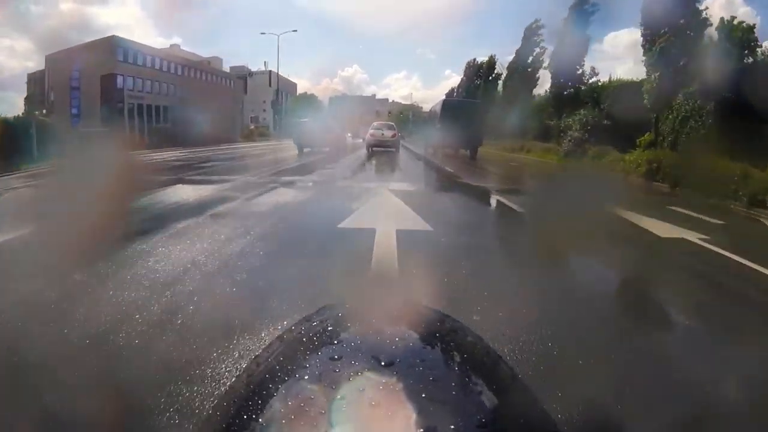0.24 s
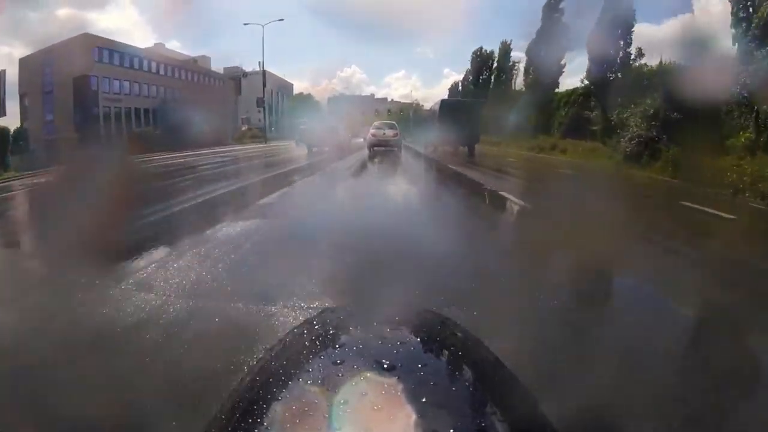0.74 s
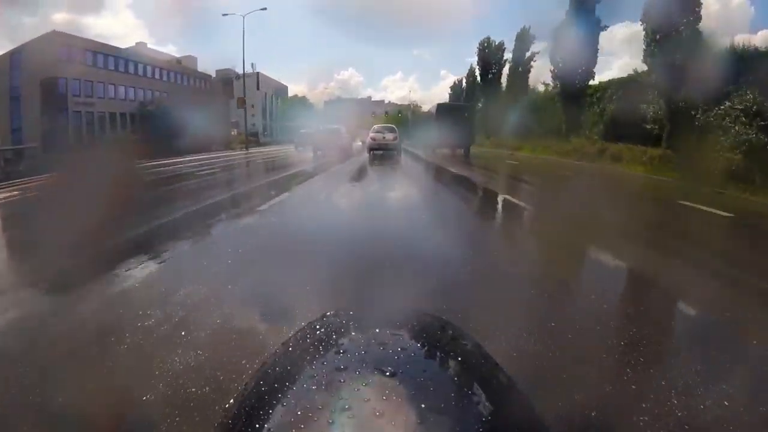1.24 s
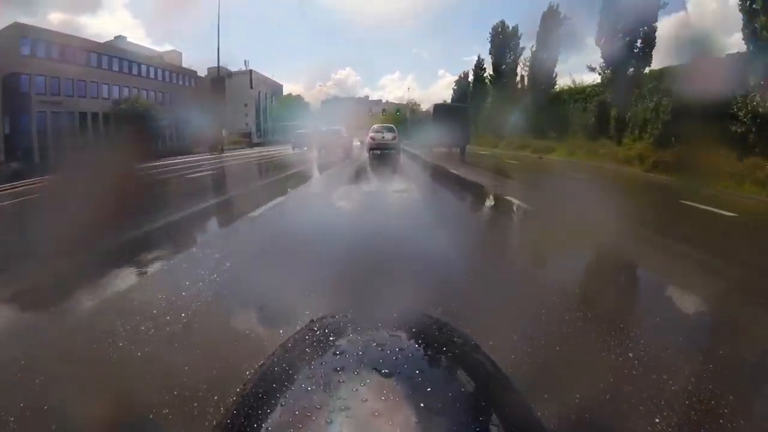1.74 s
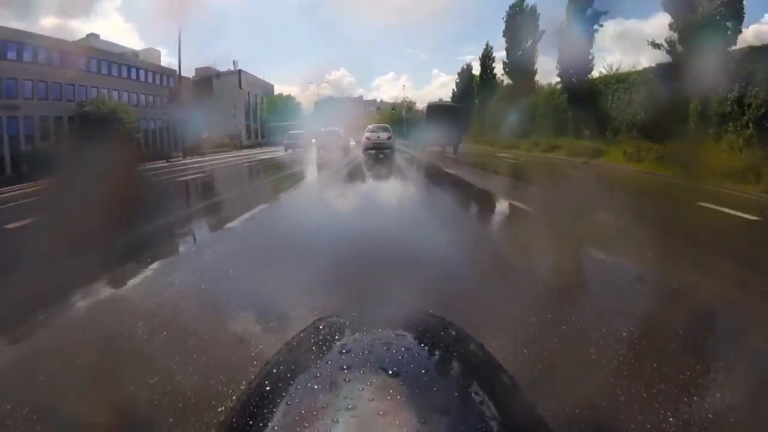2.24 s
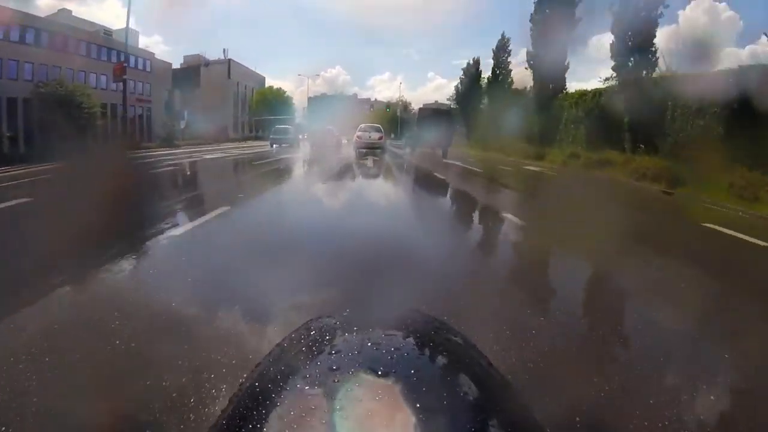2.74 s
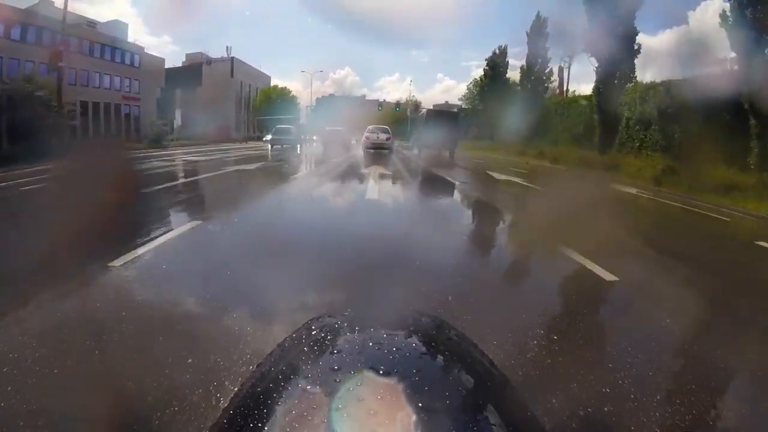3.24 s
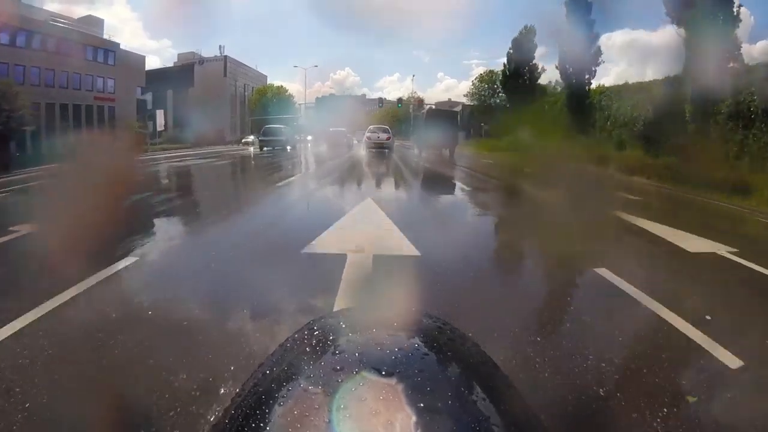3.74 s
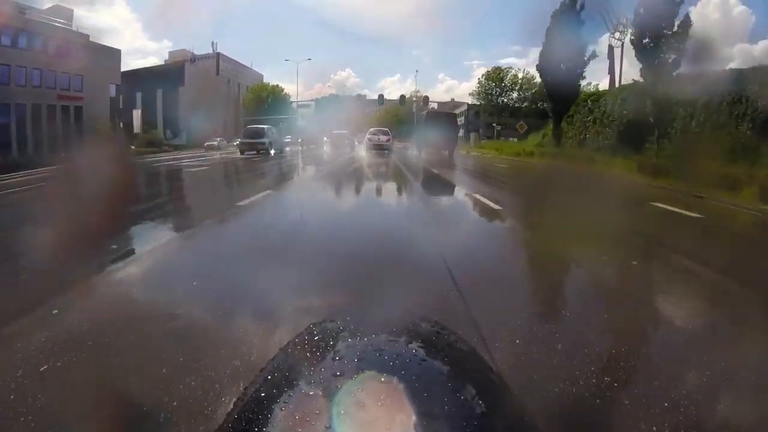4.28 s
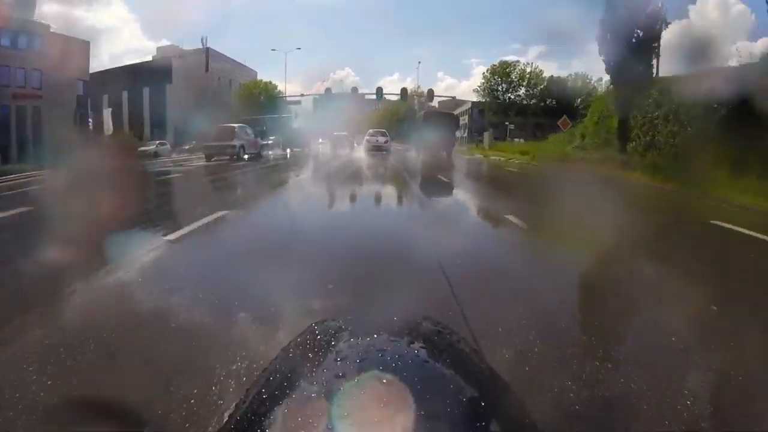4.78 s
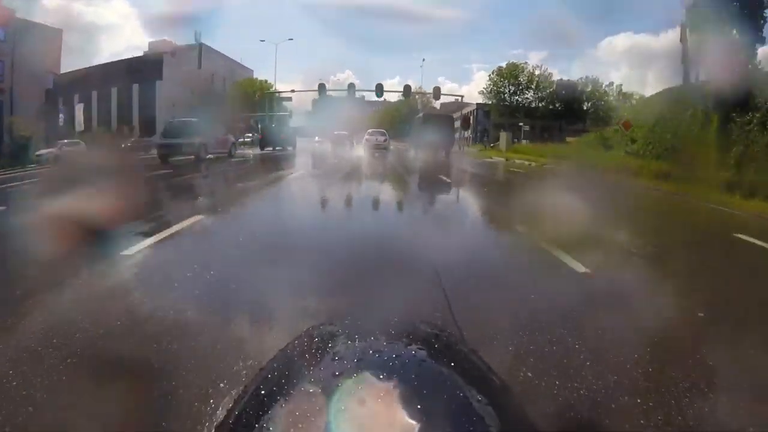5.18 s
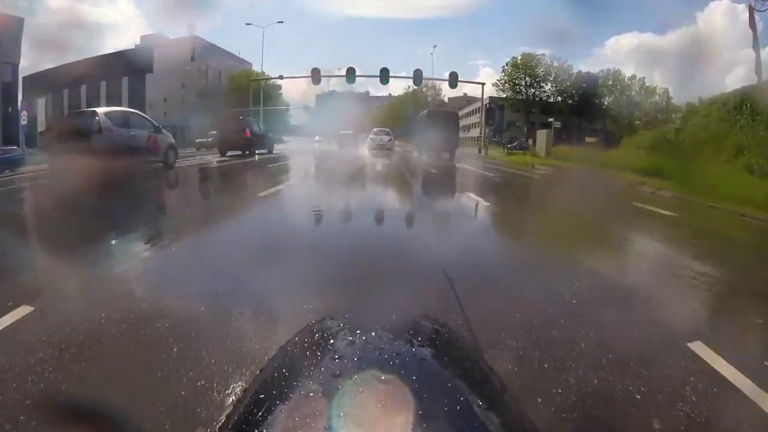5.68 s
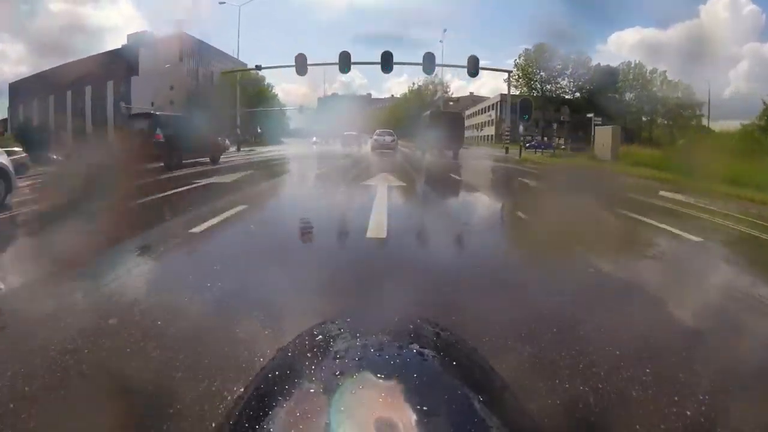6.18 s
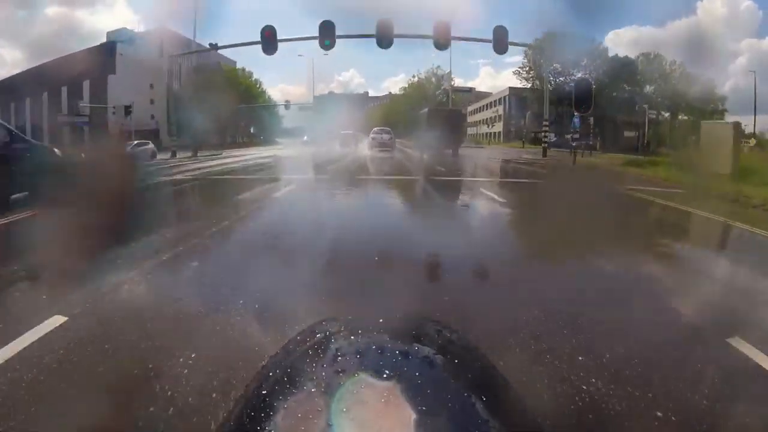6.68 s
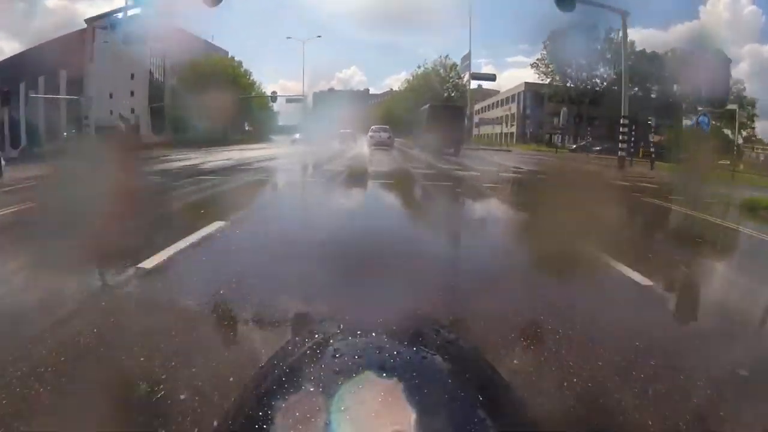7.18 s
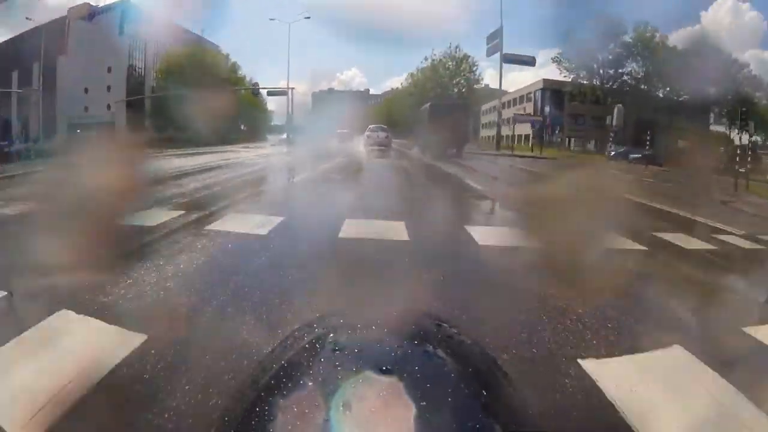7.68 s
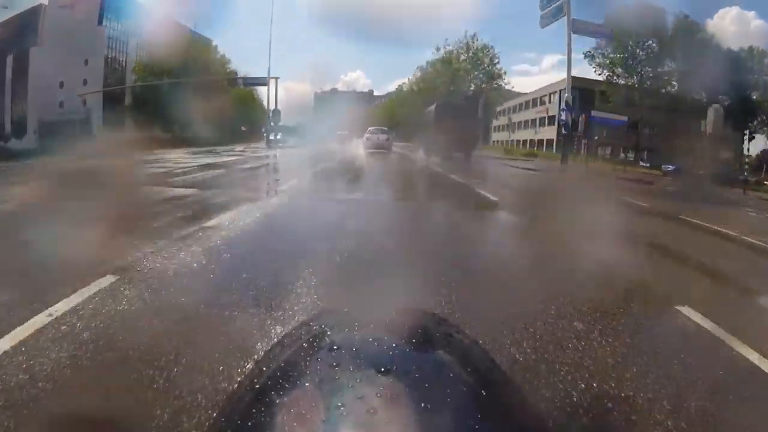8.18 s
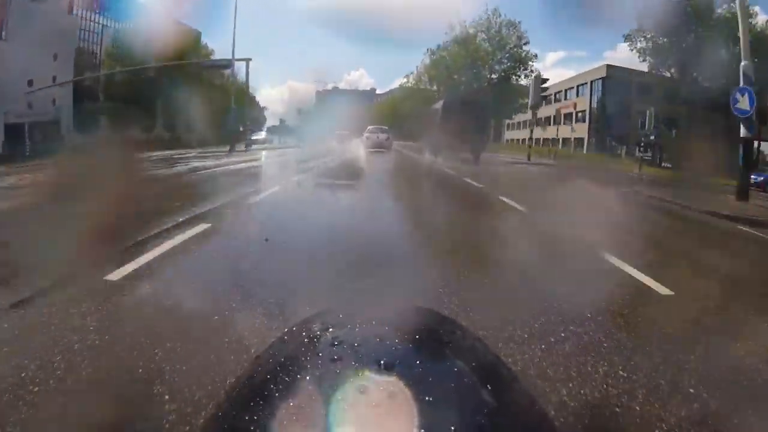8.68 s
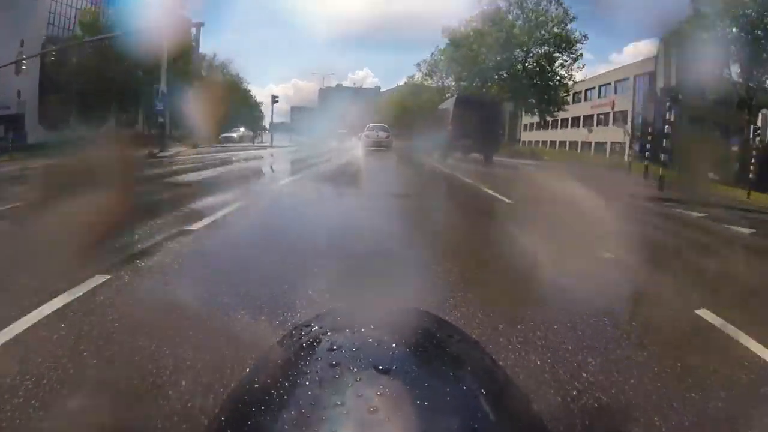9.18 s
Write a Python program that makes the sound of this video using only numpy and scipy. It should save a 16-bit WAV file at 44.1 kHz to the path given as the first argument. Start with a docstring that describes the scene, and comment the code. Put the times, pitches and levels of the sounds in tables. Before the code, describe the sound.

Heavy wind buffets a microphone behind the screen of a motorcycle on a wet city road for about nine seconds. A deep rumble runs under uneven gusts, and short, sharp slaps of air hit the microphone irregularly, hardest around 0.6 to 1.5 seconds and near 7.8. Beneath the wind, a low exhaust drone and faint gear whine rise smoothly in pitch, levelling off at about 8.5 seconds. The drone is faint at first, swells at around 4.7 seconds, stays strong until nearly 7, fades by 8.5 and comes back at the end. The tyres make a soft hiss of spray throughout, fullest from 3 to 4.4 seconds, then dropping suddenly before partly returning. Brief, light splashes come at about 0.5, 1.6 and 6 seconds. The wind turns brighter and more tearing around 1.5 seconds and again from 7 to 8.5.

```python
"""A rain-soaked city road, heard from behind the screen of a motorcycle gathering speed.
Wind buffets the microphone in gusts, and single eddies slap its port. The tyres tear off a hiss
of spray and splash through standing water. Underneath, the exhaust drones and the gears whine,
all rising with the engine. The housing round the microphone colours the treble."""
import sys
import numpy as np
from scipy import signal
from scipy.fft import rfft, irfft, next_fast_len
from scipy.io import wavfile
from scipy.ndimage import uniform_filter1d

SR = 44100
rng = np.random.default_rng(int(sys.argv[2]) if len(sys.argv) > 2 else 0)


def wrap_up_sound(samples):
    """Save the sound to the file named by the first command line argument, as 16-bit audio."""
    columns = np.atleast_2d(samples).T
    # keep every value between -1 and 1, then stretch to whole-number steps
    tamed = np.clip(columns, -1, 1)
    steps = np.round(tamed * 32767).astype(np.int16)
    wavfile.write(sys.argv[1], SR, steps)


N = 415422

# Engine speed. Each row: time in seconds, firing rate in Hz.
FIRING_HZ = [(0, 59.5), (1.3, 63), (2, 65.4), (2.5, 68), (3.1, 71), (3.7, 73.7), (4.2, 76.8), (4.7, 81.2),
             (5.5, 87.4), (6, 91.2), (6.7, 96.5), (7.3, 99.8), (8.3, 103.4), (8.8, 103.9), (9.42, 104)]
# Exhaust drone at the firing rate. Each row: time in seconds, level in dB.
DRONE_DB = [(0, -42.5), (1.8, -39), (2.4, -32), (4.35, -33.5), (4.75, -22.5), (5.1, -19), (5.7, -20.5),
            (6.1, -22), (6.7, -23.5), (8.5, -38.5), (9.42, -25.5)]
# Exhaust overtones and gear tones, each swelling through a resonance.
# Each row: multiple of the firing rate, resonance in Hz, width in Hz, level at resonance in dB.
WHINES = [(2, 150, 14, -37), (2, 186, 56, -40), (3, 200, 40, -37.5), (3, 295, 50, -38), (5, 518, 7, -39),
          (6.12, 476, 46, -38.5), (6.12, 585, 70, -44), (6.55, 474, 30, -41.5), (12, 890, 36, -43),
          (12.23, 905, 72, -38.5), (12.23, 840, 40, -50), (12.23, 1220, 60, -45), (14.75, 1090, 160, -48.5),
          (11.55, 1045, 110, -47), (18.05, 1300, 130, -53), (24, 2100, 260, -57.5),
          (47.7, 4720, 220, -53.5), (48, 4980, 60, -59.5)]
# Steady flow round the screen. Each row: time in seconds, buffeting in dB, rumble in dB.
AIRFLOW_DB = [(0, -29.5, -22.5), (.8, -31.5, -27), (1.5, -28.5, -26.5), (2, -32, -31), (3, -30, -24),
              (4.3, -26.5, -24), (4.65, -34.5, -28), (5.4, -31, -36), (5.7, -31.5, -26), (6.4, -28, -28),
              (7.1, -23.5, -25.5), (7.999, -28.5, -26.5), (8.25, -29, -31), (8.7, -28.5, -27),
              (9.42, -28, -21.5)]
# Gusts over the screen. Each row: start in seconds, length in seconds, buffeting in dB, tilt in dB.
GUSTS = [(0.113, 0.031, -21.5, -6), (0.217, .07, -25.5, 0.5), (0.345, .07, -25, -13),
         (0.629, .09, -22, -1.5), (0.734, .15, -24, 3.5), (0.976, .19, -28, 3), (1.236, .2, -27, 10),
         (1.471, 0.15, -30.5, 17.5), (1.656, 0.082, -28.5, 22), (1.926, 0.043, -27.5, -4.5),
         (2.21, 0.023, -26, -10), (2.34, .14, -25, 0.5), (2.528, .15, -25, -1.5), (3.389, 0.33, -28, -12.5),
         (4.06, .11, -24, -4.5), (4.178, .1, -23, -0.5), (4.278, 0.099, -20.5, 3), (4.837, .035, -31, 9.5),
         (4.942, 0.098, -30, 1.5), (5.566, 0.14, -24, 0.5), (5.698, 0.074, -23.5, -0.5),
         (5.811, .26, -26, 2), (6.473, 0.041, -22, 1), (6.626, 0.023, -22.5, -1), (6.898, 0.09, -22.5, 7.5),
         (7.057, .07, -24, 3), (7.175, 0.2, -35, 7), (7.611, 0.503, -29, 11), (7.788, .23, -24.5, 1.5),
         (8.138, 0.46, -37, 15), (8.812, 0.067, -20, -4.5), (9.064, 0.069, -23, -10.5),
         (9.214, 0.25, -22.5, -6.5)]
# Buffeting spectrum. Each row: frequency in Hz, density in dB.
WIND_SPECTRUM_DB = [(60, -28.5), (85, 10), (120, 8.5), (200, 6.5), (300, 2), (500, -3), (700, -6),
                    (1000, -10), (1300, -13.5), (2000, -20), (3000, -27.5), (4100, -33), (5500, -46.5),
                    (9500, -52)]
# Spectrum of the wind's slow pressure swell. Each row: frequency in Hz, density in dB.
RUMBLE_SPECTRUM_DB = [(10, -21), (20, -8), (32, -1), (52, -2), (75, 1.5), (105, -19.5), (160, -19)]
# Tyre hiss, louder over standing water. Each row: time in seconds, level in dB.
SPRAY_DB = [(0, -48.5), (.82, -50.5), (.92, -53.5), (1.3, -51.5), (1.85, -53), (2.75, -47.5), (3.1, -45.5),
            (3.95, -42.5), (4.44, -45.5), (4.48, -56.5), (5, -52.5), (6, -50.5), (6.6, -50.5),
            (7.27, -48.5), (7.45, -52), (8.25, -57), (8.95, -51), (9.42, -54.5)]
# Spray spectrum. Each row: frequency in Hz, density in dB.
SPRAY_SPECTRUM_DB = [(300, -4.5), (500, 6.5), (720, -5.5), (1050, 4.5), (1700, -4.5), (2400, 0),
                     (3200, -2.5), (4500, -3), (5400, -4), (6500, -6), (9500, -11), (11000, -44)]
# Water film on the housing. Each row: time in seconds, gain in dB of the spray above about 6 kHz.
FILM_DB = [(0, 1), (6, 0), (7.2, -2), (7.7, -2.5), (8.7, -9), (9.42, -5.5)]
# Eddies bursting on the port. Each row: time in seconds, front in dB, front width in ms, rasp in dB.
SLAPS = [(0.1342, -8.5, .5, -33), (0.629, -6, 1, -41), (0.6442, -7, 0.38, -41), (0.652, -4.5, .38, -36.5),
         (0.8393, -7.5, 0.77, -27.5), (.914, -3.5, 0.48, -31), (1.051, -18, .6, -41),
         (1.3288, -10.5, 0.44, -31), (1.4359, -10.5, 0.26, -20.5), (1.503, -3.5, 0.28, -23),
         (2.065, -11, 0.35, -26.5), (2.8031, -8, .4, -35), (3.327, -14.5, .52, -33),
         (4.0435, -11, 0.62, -39), (4.461, -9, .5, -36.5), (4.5162, -10.5, 0.91, -36),
         (4.9544, -20.5, .26, -36.5), (5.592, -14.5, 0.28, -27.5), (5.74, -10, 0.2, -32),
         (5.9734, -15.5, 0.34, -21), (6.2144, -18, 0.28, -22.5), (6.3124, -12, .65, -25),
         (6.925, -12.5, 0.19, -25), (7.423, -9.5, .48, -27.5), (7.7599, -5, 0.8, -23.5),
         (7.8754, -10.5, 0.79, -30), (8.074, -13.5, 0.17, -22), (8.5923, -10, 0.64, -29),
         (9.0662, -10, 0.38, -25.5), (9.1715, -13, 0.28, -31), (9.316, -13, 0.41, -43)]
# Spectrum of the rasp round a slap. Each row: frequency in Hz, density in dB.
RASP_SPECTRUM_DB = [(200, -16), (500, 1.5), (1000, -4.5), (2000, -19.5), (3200, -23), (6000, -33.5)]
# Splashes. Each row: centre in seconds, half length in seconds, level in dB.
SPLASHES = [(0.518, 0.098, -43.5), (1.556, 0.0034, -37), (1.725, 0.024, -44.5), (5.986, 0.036, -45)]
# Splash spectrum. Each row: frequency in Hz, density in dB.
SPLASH_SPECTRUM_DB = [(1500, -5.5), (3800, -9), (5400, -6.5), (6600, -12.5), (9000, -15)]
# Treble peaks and notches of the housing. Each row: frequency in Hz, gain in dB.
HOUSING_DB = [(1, 0), (3200, 0), (4100, -3), (4800, 3), (5600, 4), (5850, -2), (6030, -8), (6270, -3.5),
              (6420, 5), (6900, 1.5), (7600, -3), (8500, -3), (9150, 0), (9550, -3), (11000, -20)]

TIME_S = np.arange(N) / SR


def from_db(db):
    """Decibels to gain."""
    return 10 ** (np.asarray(db) / 20)


def unit_rms(x):
    """Scale to rms 1."""
    return x / np.sqrt(np.mean(x ** 2) + 1e-20)


def curve(rows):
    """Rows of time and value, interpolated at every sample."""
    return np.interp(TIME_S, *np.transpose(rows))


def gain_at(spectrum_db, hz):
    """Gain of a spectrum table at hz; -90 dB beyond its ends."""
    knots_hz, db = np.transpose(spectrum_db)
    return from_db(np.interp(np.log(hz + 1e-3), np.log(knots_hz), db, left=-90, right=-90))


def drift(rate_hz):
    """Smooth random curve of rms 1, changing at about rate_hz."""
    hop, settle = 20, 4000
    pole = np.exp(-2 * np.pi * rate_hz * hop / SR)
    white = rng.standard_normal(N // hop + settle + 2)
    slow = signal.lfilter([1], [1, -2 * pole, pole * pole], white)[settle:]
    return np.interp(np.arange(N) / hop, np.arange(len(slow)), unit_rms(slow))


def noise(shape):
    """Noise with gain shape(hz); gain 1 over a 1 kHz band gives rms 1."""
    size = next_fast_len(N)
    hz = np.arange(size // 2 + 1) * SR / size
    return irfft(rfft(rng.standard_normal(size)) * shape(hz), size)[:N] * np.sqrt(SR / 2000)


def flicker(wander, depth_db):
    """Gain of rms 1 that follows wander, soft-limited, by about depth_db per unit."""
    return unit_rms(from_db(depth_db * 3.48 * np.tanh(wander / 3.65)))


def engine():
    """Firing tone, overtones and gear mesh tones all turn with one crankshaft."""
    firing_hz = curve(FIRING_HZ)
    phase_rad = 2 * np.pi * np.cumsum(firing_hz * (1 + .0015 * drift(6.3))) / SR
    out = np.sin(phase_rad) * from_db(curve(DRONE_DB)) * flicker(drift(11), depth_db=-1.0)
    for multiple, centre_hz, width_hz, db in WHINES:
        resonance = 1 / (1 + (2 * (multiple * firing_hz - centre_hz) / width_hz) ** 2)
        backlash_rad = 0.027 * multiple * drift(45)  # tooth play blurs the higher tones
        tone = np.sin(multiple * phase_rad + backlash_rad)
        out += from_db(db) * resonance * tone * flicker(drift(3 * multiple), depth_db=2.5)
    return np.sqrt(2) * out


def airflow():
    """Steady flow, gusts and the puffs that slaps drag along add in power; returns three dB curves."""
    attack_s, release_s, puff_db = 0.022, 0.042, -18.5
    knots_s, steady_db, rumble_db = np.transpose(AIRFLOW_DB)
    power = from_db(np.interp(TIME_S, knots_s, steady_db)) ** 2
    weighted_tilt = 0
    for start_s, length_s, db, gust_tilt_db in GUSTS:
        corners_s = [-attack_s / 2, attack_s / 2, length_s, length_s + release_s]
        gust_power = (from_db(db) * np.interp(TIME_S - start_s, corners_s, [0, 1, 1, 0])) ** 2
        power += gust_power
        weighted_tilt += gust_power * gust_tilt_db
    for at_s, front_db, _, _ in SLAPS:
        puff = np.interp(TIME_S - at_s, [-0.0065, 0, 0.026], [0, 1, 0])
        power += (from_db(front_db + puff_db) * puff) ** 2
    buffet_db = 10 * np.log10(power) + 1.1 * drift(18.2)
    firing_hz = curve(FIRING_HZ)
    speed_tilt_db = -2.5 + 0.2316 * (firing_hz - firing_hz.mean())  # air tears more finely with speed
    tilt_db = speed_tilt_db + weighted_tilt / power
    return buffet_db, tilt_db, np.interp(TIME_S, knots_s, rumble_db)


def wind():
    """Eddies hit all octaves at once, over a low swell; the treble flickers most deeply."""
    buffet_db, tilt_db, rumble_db = airflow()
    tilt_db += 0.084 * (buffet_db + 19.0)  # stronger flow is brighter
    eddies = 0.45 * drift(25) + 0.93 * drift(130)
    buffet = 0
    for centre_hz in 62.5 * 2. ** np.arange(8):
        octave = lambda hz: np.cos(np.pi / 2 * np.clip(np.log2((hz + 1e-3) / centre_hz), -1, 1))
        band = noise(lambda hz: gain_at(WIND_SPECTRUM_DB, hz) * octave(hz))
        treble_weight = np.clip(np.log2(centre_hz / 350) / 2.5, 0, 1.2)
        bursts = flicker(eddies + 0.46 * drift(77), depth_db=2.5 + 0.39 * treble_weight)
        buffet += band * bursts * from_db(treble_weight * tilt_db)
    swell = unit_rms(noise(lambda hz: gain_at(RUMBLE_SPECTRUM_DB, hz)))
    swell /= np.sqrt(uniform_filter1d(swell ** 2, size=7000) + 0.048)  # evens the level
    rumble = swell * from_db(rumble_db) * flicker(drift(11), depth_db=2.5)
    return buffet * stalls() * from_db(buffet_db) + rumble


def spray():
    """Water torn off the tyres hisses; a film on the housing dulls its top."""
    top_share = lambda hz: np.clip((hz - 5400) / 1000, 0, 1)
    body = noise(lambda hz: gain_at(SPRAY_SPECTRUM_DB, hz) * np.sqrt(1 - top_share(hz)))
    top = noise(lambda hz: gain_at(SPRAY_SPECTRUM_DB, hz) * np.sqrt(top_share(hz)))
    hiss = body + top * from_db(curve(FILM_DB))
    return hiss * from_db(curve(SPRAY_DB)) * flicker(drift(45), depth_db=0.64)


def stalls(depth_db=-4.0, length_s=0.02):
    """The flow stalls just before an eddy bursts; returns a gain."""
    corners_s = [-length_s, -length_s / 2, -length_s / 10, 0]
    dips = sum(np.interp(TIME_S - at_s, corners_s, [0, 1, 1, 0]) for at_s, *_ in SLAPS)
    return from_db(depth_db * np.minimum(dips, 1))


def slaps(rasp_decay_s=0.011):
    """An eddy passes the port as one steep pressure front inside a short rasp of torn air."""
    out = np.zeros(N)
    offsets = np.arange(-SR // 20, SR // 20)
    lag_s = offsets / SR
    rasp = noise(lambda hz: gain_at(RASP_SPECTRUM_DB, hz))
    rasp_envelope = np.exp(-np.abs(lag_s) / rasp_decay_s)
    for at_s, front_db, front_ms, rasp_db in SLAPS:
        angle_rad = rng.uniform(0, 2 * np.pi)  # direct hit: a spike; glancing: push and pull
        front = np.real(np.exp(1j * angle_rad) / (1 + 1j * lag_s * 1000 / front_ms) ** 2)
        span = int(at_s * SR) + offsets
        out[span] += from_db(front_db) * front + from_db(rasp_db) * rasp[span] * rasp_envelope
    return out


def splashes():
    """Deeper water throws up brief, bright sheets of spray."""
    envelope = np.zeros(N)
    for centre_s, half_length_s, db in SPLASHES:
        envelope += from_db(db) * np.exp(-.5 * ((TIME_S - centre_s) / half_length_s) ** 2)
    return envelope * noise(lambda hz: gain_at(SPLASH_SPECTRUM_DB, hz))


def scene():
    """All sources at one microphone."""
    return (engine() + wind() + slaps() + spray() + splashes())[None]


def record(dry):
    """Housing colour, soft clipping, end fades, low-pass."""
    ceiling, cutoff_hz = .5, 9650
    size = next_fast_len(N + SR // 10)
    hz = np.arange(size // 2 + 1) * SR / size
    housed = irfft(rfft(dry, size) * gain_at(HOUSING_DB, hz), size)[:, :N]
    clipped = ceiling * np.tanh(housed / ceiling)
    faded = clipped * signal.windows.tukey(N, .0005)
    return signal.sosfilt(signal.ellip(10, .3, 70, cutoff_hz, fs=SR, output="sos"), faded)


dry = scene()
out = record(dry)
wrap_up_sound(out)
```